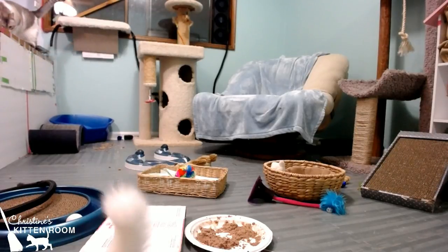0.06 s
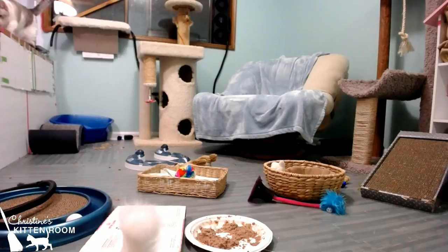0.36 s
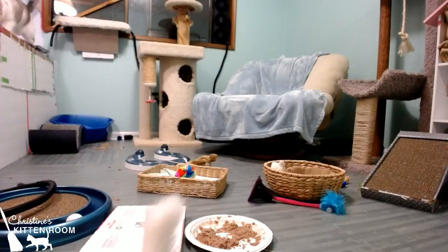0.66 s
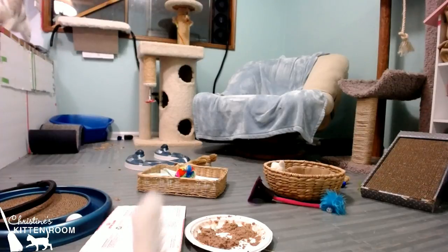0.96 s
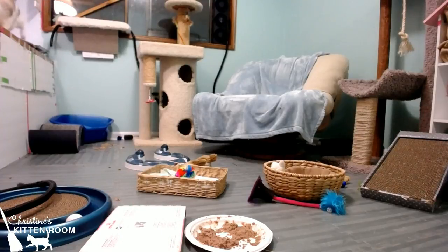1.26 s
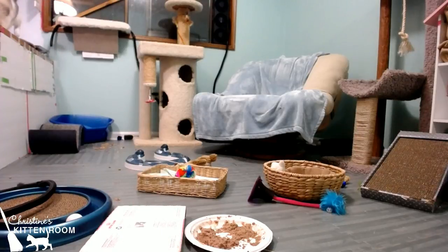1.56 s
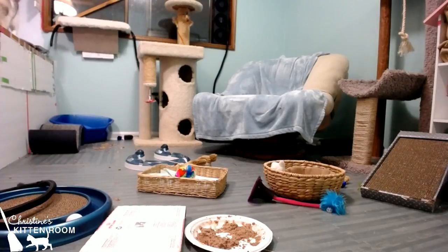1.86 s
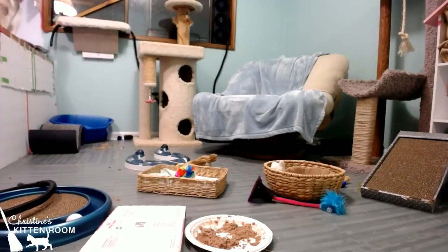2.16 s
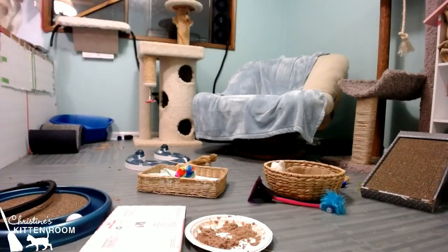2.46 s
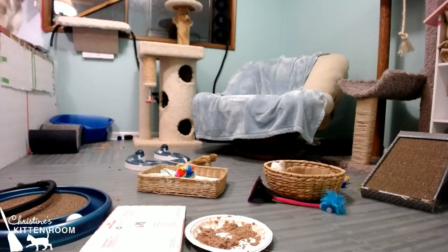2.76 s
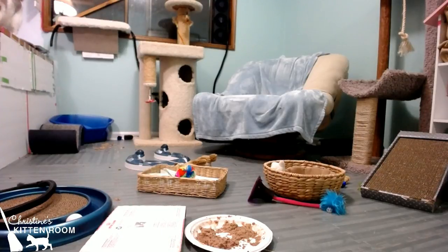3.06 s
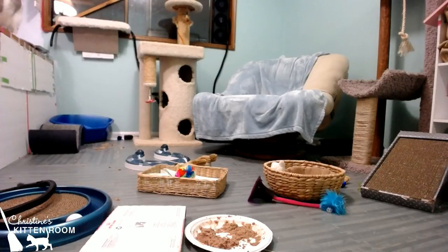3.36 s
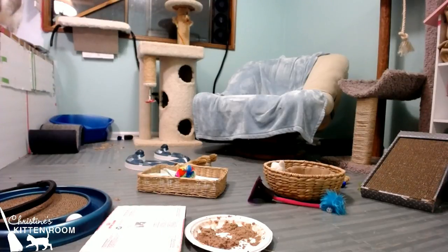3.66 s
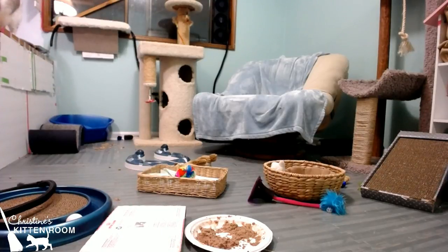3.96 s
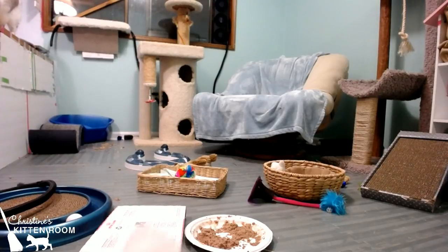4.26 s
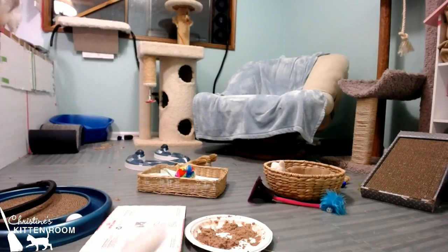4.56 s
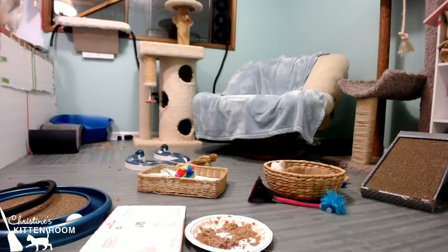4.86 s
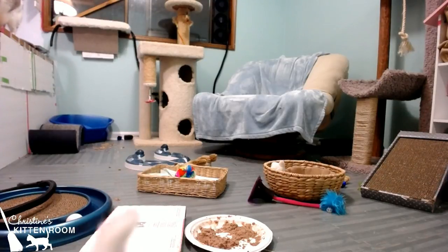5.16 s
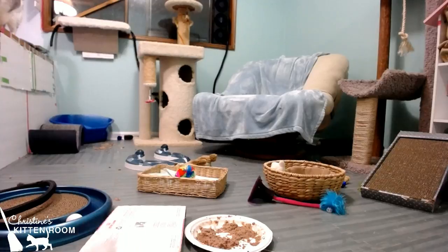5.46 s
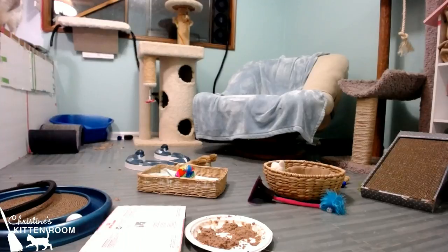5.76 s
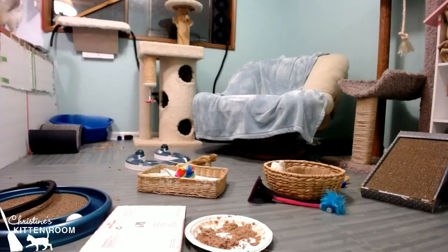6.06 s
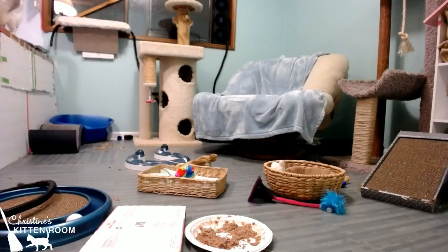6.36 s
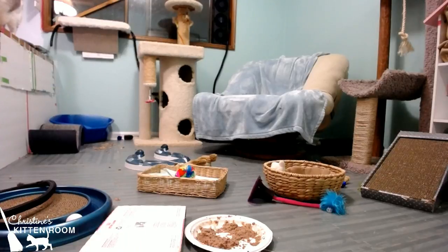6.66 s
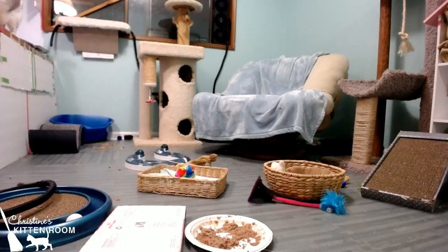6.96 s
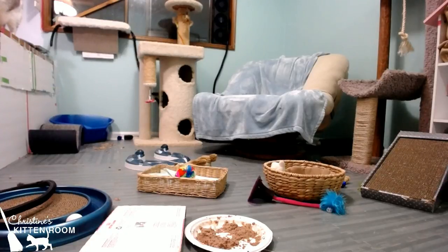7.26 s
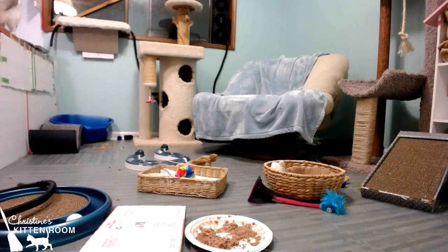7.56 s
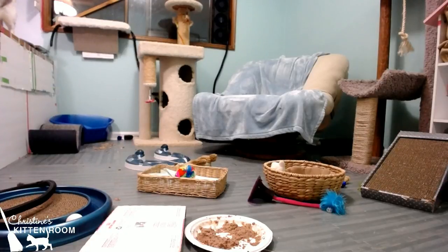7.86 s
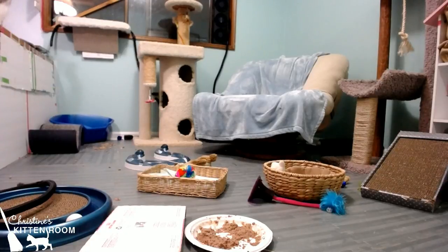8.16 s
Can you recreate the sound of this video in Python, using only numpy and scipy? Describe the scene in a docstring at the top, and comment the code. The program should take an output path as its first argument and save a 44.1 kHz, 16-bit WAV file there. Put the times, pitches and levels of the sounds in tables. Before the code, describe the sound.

In a quiet little room with a faint hum, a light plastic toy rattles briefly at a distance. Close to the microphone, kitten paws make irregular hollow taps and short rubbing sounds on a hard floor. The toy knocks again, and a sparse stretch of soft pats and brushing fur follows. Toward the end come more taps, small thumps, a brief soft rumble and sharp claw clicks.

```python
"""A small quiet room with a hard floor, where kittens pad about right beside a camera.
Each paw lands with a short hollow pock, sometimes with a claw click or a thump of weight, and soft pats
come singly or in quick flurries. Sliding pads rub and catch at random; brushing fur hisses.
Further off a plastic toy is knocked about. Near the end a soft rumble swells, like a nudge to the
camera. Under it all lie room air and an appliance's faint hum and whine."""
import sys
import numpy as np
from scipy import signal
from scipy.fft import rfft, irfft, next_fast_len
from scipy.io import wavfile
from scipy.ndimage import map_coordinates

SR = 44100
rng = np.random.default_rng(int(sys.argv[2]) if len(sys.argv) > 2 else 0)


def bounce(signal):
    """Save signal as a 16-bit WAV file at the path given by the first command-line argument."""
    frames = np.transpose(np.atleast_2d(signal))
    limited = np.clip(frames, -1, 1)
    pcm = np.round(limited * 32767).astype(np.int16)
    wavfile.write(sys.argv[1], SR, pcm)


N = 362502

# The hard upper resonances of a paw on the floor. Each row: frequency in Hz, level in dB.
CLACK_COLOUR = [(700, -26.5), (1350, -13), (1650, -5.5), (2000, -10), (2300, -8), (2900, -10.5),
                (4000, -21.5), (8000, -61)]
# The hollow ring under a rubbing pad or a knocked toy. Each row: frequency in Hz, level in dB.
HOLLOW_COLOUR = [(200, -42.5), (500, -27.5), (700, -23), (850, 0), (980, 1.5), (1130, -7.5), (1400, -18.5),
                 (1650, -22.5), (2100, -38), (4000, -53)]
POCK_HZ = 952.7  # base pitch of a pad on the floor


def paw_contacts():
    """Every landing, hard catch and soft pat, as columns: time in s, pock in dB, pock in Hz, claw and thump in
    dB."""
    # Paws landing, or catching hard as they slide. Each row: time in seconds, then pock, claw and thump levels
    # in dB.
    impacts = [(0.3891, -32, -56.5, -32), (.398, -29.5, -52.5, -45), (.443, -34.5, -61, -98),
               (0.754, -11.5, -41.5, -46.5), (0.8482, -34.5, -79.5, -56), (1.1534, -16.5, -35.5, -45.5),
               (1.165, -4, -26.5, -55), (1.4213, -28, -64, -85), (1.594, -29, -79, -59),
               (1.6076, -19.5, -71.5, -46), (1.9933, -25.5, -39.5, -63), (3.5838, -27, -54, -69),
               (3.7033, -31.5, -72.5, -61), (3.941, -34.5, -64, -70), (3.9596, -37, -44.5, -50),
               (5.1013, -14.5, -41.5, -40), (5.7166, -22, -45.5, -35.5), (6.029, -33.5, -78, -68),
               (6.0684, -34, -84, -77), (6.3989, -29.5, -57, -54), (6.564, -35, -72.5, -51.5),
               (6.707, -16, -63, -33), (6.7822, -22.5, -63, -40.5), (6.9148, -34.5, -66.5, -42.5),
               (7.1013, -28.5, -57.5, -74.5), (7.1131, -26.5, -60, -63), (7.3718, -28.5, -58, -63),
               (7.4169, -13.5, -30, -47), (7.6093, -37.5, -73, -68), (7.75, -17, -18.5, -27),
               (7.9641, -29.5, -68.5, -67), (8.0105, -22.5, -28, -40.5), (8.2146, -29, -74, -59)]
    # Soft pats, single or in quick runs. Each row: start in seconds, length in seconds.
    flurries = [(4.161, .16), (6.293, .055), (7.006, .02)]
    db_per_octave = 323.5  # the pock rises slightly as the claw outweighs the thump
    landings = [(s, pock, POCK_HZ * 2 ** ((claw - thump) / db_per_octave), claw, thump)
                for s, pock, claw, thump in impacts]
    gap_s, pat_db, pat_hz, claw_db, thump_db = .0358, -42.5, 764, -87, -53
    pats = [(s, pat_db, pat_hz, claw_db, thump_db)
            for start, length in flurries for s in np.arange(start, start + length, gap_s)]
    return np.transpose(landings + pats)


def paw_steps():
    """The pad lands with a hollow pock; the kitten's weight thumps the floor."""
    s, pock_db, pock_hz, claw_db, thump_db = paw_contacts()
    pock = pulses(s, pock_db, pock_hz, swell_s=.00086, fade_s=.0011)
    overtone = pulses(s, pock_db - 25.5, 1.723 * pock_hz, swell_s=.0024, fade_s=.0035)
    # the harder pad and claw land together, the more the upper resonances clack
    clack_db = claw_db + .51 * (pock_db - claw_db) - 6
    clack = bursts(s - .0025, clack_db, CLACK_COLOUR, rise_s=.003, t60=.016)
    # a sharp landing is briefer, so its thump is higher
    thump_hz = 175 * 2 ** ((claw_db + 49) / 75)
    thump = pulses(s, thump_db, thump_hz, swell_s=.00067, fade_s=.0027)
    body = pulses(s, thump_db - 3.5, .43 * pock_hz, swell_s=.0002, fade_s=.00073)
    return pock + overtone + clack + thump + body


def claw_clicks(gain_db, rise_s, t60):
    """A claw clicks on the floor just before the pad lands."""
    # The bright tick of a claw. Each row: frequency in Hz, level in dB.
    claw_colour = [(1200, -27), (2700, 2.5), (3400, 3.5), (4300, -5.5), (5400, -4.5), (6600, -4.5),
                   (8200, -8.5), (11000, -22), (15500, -36.5)]
    s, _, _, claw_db, _ = paw_contacts()
    return bursts(s - .0025, claw_db + gain_db, claw_colour, rise_s, t60)


def scuffs():
    """Paws and fur slide: each stroke swells and fades as it rubs, catches, rasps and hisses."""
    # Strokes. Each row: middle in seconds, half length in seconds, hollow rub in dB, scrape in dB.
    slides = [(.005, .02, -46, -47.5), (0.935, .046, -55, -56), (1.064, 0.015, -36, -53.5),
              (1.386, 0.061, -55.5, -57), (1.421, .021, -32, -48.5), (1.631, 0.058, -38.5, -81),
              (1.773, 0.1, -46, -66), (1.945, 0.025, -46, -77), (1.989, 0.011, -32, -40),
              (2.419, 0.0145, -67, -64), (3.607, 0.0487, -47.5, -63), (3.973, .027, -47, -64.5),
              (4.347, 0.039, -61.5, -61.5), (4.494, 0.021, -52, -54.5), (4.599, 0.0094, -35.5, -48.5),
              (4.647, 0.023, -62, -53), (4.831, .014, -75, -63), (5.364, .015, -44.5, -66),
              (5.565, 0.092, -48, -52.5), (5.701, .04, -47.5, -56), (5.878, 0.11, -53.5, -67),
              (6.067, 0.016, -46.5, -73), (6.154, 0.021, -52, -78), (6.377, 0.035, -44, -63.5),
              (6.706, 0.028, -41, -64), (7.173, .018, -50.5, -51), (7.334, 0.016, -56.5, -50),
              (7.43, .017, -33, -46.5), (8.054, 0.046, -44, -46.5)]
    # The fur's hiss against the rasp of a stroke. Each row: time in seconds, offset in dB.
    fur_balance = [(2.4, -11), (3.6, 5), (3.98, 6.5), (4.6, -12.5), (5.55, -6.5), (6.5, -10)]
    # The airy hiss of brushing fur. Each row: frequency in Hz, level in dB.
    fur_colour = [(1200, -31), (3000, -3.5), (4300, -0.5), (6500, 0), (8300, 1), (12500, -11.5),
                  (15000, -26)]
    middle, half, rub_db, scrape_db = np.transpose(slides)
    fur_db = scrape_db + np.interp(middle, *np.transpose(fur_balance))
    t, coarse_t = np.arange(N) / SR, np.arange(0, N, SR // 500) / SR
    strokes = np.exp(-((coarse_t - middle[:, None]) / half[:, None]) ** 2)

    def envelope(db):
        """Overlapping strokes add in power."""
        return np.interp(t, coarse_t, np.sqrt(amp(db) ** 2 @ strokes ** 2))

    rub = envelope(rub_db) * (friction(HOLLOW_COLOUR, rough_db=4.5, rate=220) + pad_catches())
    rasp = envelope(scrape_db) * friction(CLACK_COLOUR, rough_db=7, rate=400)
    fur = envelope(fur_db) * friction(fur_colour, rough_db=4, rate=130)
    return rub + rasp + fur


def friction(colour, rough_db, rate):
    """Tiny catches and slips of uneven strength excite a resonance."""
    grain = rng.standard_normal(N) * amp(rough_db * np.clip(wobble(rate), -2, 2))
    return coloured(grain, colour)


def pad_catches(per_second=50, over_rub_db=3, spread_db=.5):
    """A sliding pad catches at random moments, each time with a small pock."""
    count = int(per_second * N / SR)
    when, size = np.transpose(rng.random((count, 2)))
    levels = over_rub_db + spread_db * (2 * size - 1)
    return pulses(when * N / SR, levels, np.full(count, POCK_HZ), swell_s=.0009, fade_s=.0011)


def toy_knocks():
    """Light plastic knocks with a hollow body and a little weight; far off, their rattle lingers."""
    # The toy crossing the floor. Each row: start in seconds, then rattle, body and thump levels in dB.
    hits = [(.007, -37.5, -38, -62), (.029, -40, -61, -86), (0.127, -35.5, -70, -85),
            (0.223, -46, -57.5, -72), (0.339, -45.5, -58, -78), (2.733, -57, -50.5, -76),
            (2.848, -39.5, -42, -40.5), (2.928, -34, -41, -46.5)]
    # The rattle of thin plastic. Each row: frequency in Hz, level in dB.
    plastic_colour = [(600, -22.5), (1400, -4), (1900, 5.5), (2400, -5.5), (3400, -18), (4500, -31.5),
                      (14000, -58)]
    # The toy's weight on the floor. Each row: frequency in Hz, level in dB.
    thump_colour = [(30, -19), (150, -16.5), (240, 19), (480, 4), (1500, -56)]
    s, rattle_db, body_db, thump_db = np.transpose(hits)
    rattle = bursts(s, rattle_db, plastic_colour, rise_s=.00022, t60=.021)
    linger = bursts(s, rattle_db - 15, plastic_colour, rise_s=.012, t60=.167)
    body = bursts(s, body_db, HOLLOW_COLOUR, rise_s=.0004, t60=.034)
    thump = bursts(s, thump_db, thump_colour, rise_s=.00085, t60=.034)
    return rattle + linger + body + thump


def nudge(middle_s=7.5, half_s=.085):
    """A soft low rumble swells and fades, as of a kitten nudging the camera."""
    # Deep, muffled rumble. Each row: frequency in Hz, level in dB.
    rumble_colour = [(20, -5), (40, -1.5), (70, -9), (140, -30), (400, -85)]
    swell = np.exp(-((np.arange(N) / SR - middle_s) / half_s) ** 2)
    return amp(-52.5) * swell * noise(rumble_colour)


def ceiling_echo(x, delay_s, dull_hz):
    """One clear, duller echo from the ceiling."""
    return filtered(x, lambda hz: np.exp(-2j * np.pi * hz * delay_s) / (1 + (hz / dull_hz) ** 2))


def room_tail(build_s):
    """A diffuse two-channel decay, each frequency dying at its own speed."""
    # How long the walls ring. Each row: frequency in Hz, time to fall 60 dB in seconds.
    decay_times = [(200, .32), (600, .22), (1000, .18), (3000, 0.15), (14000, 0.16)]
    hz, t, bands = signal.stft(rng.standard_normal((2, SR // 3)), SR, nperseg=256)
    decay = amp(-60 * t / along(decay_times, hz)[:, None])
    onset = 1 - np.exp(-t / build_s)
    ring = signal.istft(bands * decay * onset, SR, nperseg=256)[1]
    return ring / np.linalg.norm(ring[0])


def room_reverb(x, stretches=24):
    """The walls answer anew as the kittens move; part of the answer differs between the ports."""
    shared, apart = np.zeros((2, N))
    edges = np.linspace(0, N, stretches + 1).astype(int)
    for start, end in zip(edges, edges[1:]):
        answer = signal.fftconvolve(x[None, start:end], room_tail(build_s=.0044), axes=1)
        add(shared, start / SR, answer[0])
        add(apart, start / SR, answer[1])
    return ports(shared) + opposed(apart)


def room_tone():
    """Low, gently wavering room air under a steady microphone hiss."""
    # The air of the quiet room. Each row: frequency in Hz, level in dB.
    air_colour = [(15, -45), (25, -9.5), (86, -16), (122, -9.5), (156, -20.5), (193, -7), (349, -14),
                  (509, -22), (804, -16), (1340, -25), (4870, -42), (5880, -37), (15500, -51.5)]
    # The part of the air that differs between the ports. Each row: frequency in Hz, gain in dB.
    air_width = [(100, -11), (700, -11.5), (2500, -0.5), (6000, -5.5)]
    diffuse = filtered(noise(air_colour), lambda hz: amp(along(air_width, hz)))
    air = (ports(noise(air_colour)) + opposed(diffuse)) * amp(-66 + 1.4 * wobble(7.4))
    hiss = amp(-79.5) * coloured(rng.standard_normal((2, N)), [(6000, 0), (11000, -3), (15500, -15)])
    return air + hiss


def appliance(hum_hz=119.5, whine_hz=6002):
    """An appliance gives off a wavering hum and a thin whine."""
    # The hum swells midway. Each row: time in seconds, level in dB.
    hum_levels = [(3.4, -69.5), (4.2, -64), (5.2, -64.5), (5.8, -72)]
    t = np.arange(N) / SR
    hum_db = np.interp(t, *np.transpose(hum_levels)) + 2 * wobble(6.2)
    hum = amp(hum_db) * np.sin(2 * np.pi * hum_hz * t + .5 * wobble(11))
    whine = amp(-85.5 + wobble(2.5)) * np.sin(2 * np.pi * whine_hz * t + .44 * wobble(80))
    return hum + whine


def ports(x):
    """Sound reaches the left microphone port first; the camera body shades each port differently."""
    # The left port's head start. Each row: frequency in Hz, lead in milliseconds.
    lead_ms = [(950, .125), (2300, .17), (3000, .2), (4000, .16), (8000, .18)]
    # Shading by the camera body. Each row: frequency in Hz, left minus right in dB.
    shading = [(700, -2), (1100, -4), (2000, 1.3), (4000, -1), (8000, .8)]

    def response(hz):
        """Each port takes half of the shading and lead, in opposite directions."""
        left = amp(along(shading, hz) / 2) * np.exp(1j * np.pi * hz * along(lead_ms, hz) / 1000)
        return np.array([left, 1 / left])

    return filtered(x, response)


def opposed(x):
    """The part of a diffuse sound that the two ports do not share, in opposite polarity."""
    return ports(x) * np.array([[1], [-1]])


def pulses(times, levels, pitches, swell_s, fade_s):
    """A brief soft tone that swells and dies away."""
    out, t = np.zeros(N), np.arange(-SR // 40, SR // 40) / SR
    shape = 1 / np.cosh(t / np.where(t < 0, swell_s, fade_s))
    for s, db, hz, phase in zip(times, levels, pitches, rng.random(len(times))):
        add(out, s + t[0], amp(db) * shape * np.cos(2 * np.pi * (hz * t + phase)))
    return out


def bursts(times, levels, colour, rise_s, t60):
    """Noise that starts fast and falls 60 dB in t60 seconds, a fresh stretch for each impact."""
    out, grain, t = np.zeros(N), noise(colour), np.arange(SR // 4) / SR
    shape = (1 - np.exp(-t / rise_s)) * amp(-60 * t / t60)
    shape /= shape.max()
    shape_rms = np.sqrt(np.mean(shape ** 2))
    for s, db, start in zip(times, levels, rng.integers(0, N - len(t), len(times))):
        add(out, s, amp(db) * shape_rms * unit(grain[start:start + len(t)] * shape))
    return out


def amp(db):
    """Decibels to gain."""
    return 10 ** (np.asarray(db) / 20)


def unit(x):
    """Scale to rms 1."""
    return x / np.sqrt(np.mean(x ** 2) + 1e-20)


def along(points, hz):
    """Read (Hz, value) points on a log frequency axis."""
    freqs, values = np.transpose(points)
    return np.interp(np.log(hz + 1), np.log(freqs), values)


def filtered(x, response):
    """Shape x by a frequency response."""
    size = next_fast_len(N + 8192)
    return irfft(rfft(x, size) * response(np.fft.rfftfreq(size, 1 / SR)), size)[..., :N]


def coloured(x, colour):
    """x in the given colour, at rms 1."""
    return unit(filtered(x, lambda hz: amp(along(colour, hz))))


def noise(colour):
    """Coloured noise of rms 1."""
    return coloured(rng.standard_normal(N), colour)


def wobble(rate):
    """A smooth random curve, rate knots a second."""
    return map_coordinates(rng.standard_normal(N // 10), [np.arange(N) * rate / SR])


def add(track, s, sound):
    """Mix a sound into a track at s seconds."""
    part = track[max(round(s * SR), 0):][:len(sound)]
    part += sound[:len(part)]


def scene():
    """Paws and toy reach the two ports directly, by one clear echo and through the room."""
    paws, rubs, knocks = paw_steps(), scuffs(), toy_knocks()
    direct = paws + claw_clicks(gain_db=-1.5, rise_s=.00023, t60=.025) + rubs + knocks
    echo = amp(-17) * ceiling_echo(direct, delay_s=.0241, dull_hz=2000)
    walls = room_reverb(amp(-13) * paws + amp(-9) * rubs + amp(-13) * knocks)
    # things close by scatter each click at once, differently at each port
    scatter = opposed(claw_clicks(gain_db=-8.5, rise_s=.0003, t60=.016))
    # the room spreads each click into a soft wash
    wash = ports(claw_clicks(gain_db=-25.5, rise_s=.0038, t60=.19))
    wash += opposed(claw_clicks(gain_db=-30, rise_s=.0079, t60=.19))
    return ports(direct + echo + nudge()) + scatter + walls + wash + room_tone() + ports(appliance())


def record(dry):
    """The camera keeps nothing above its band limit."""
    return filtered(dry, lambda hz: hz < 15730)


dry = scene()
out = record(dry)
bounce(out)
```